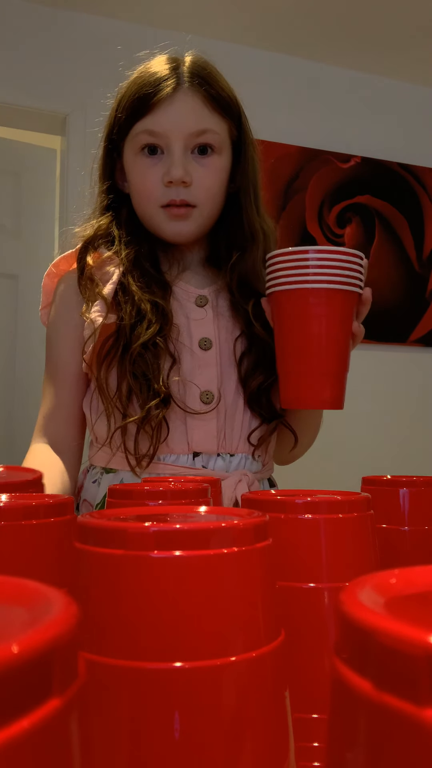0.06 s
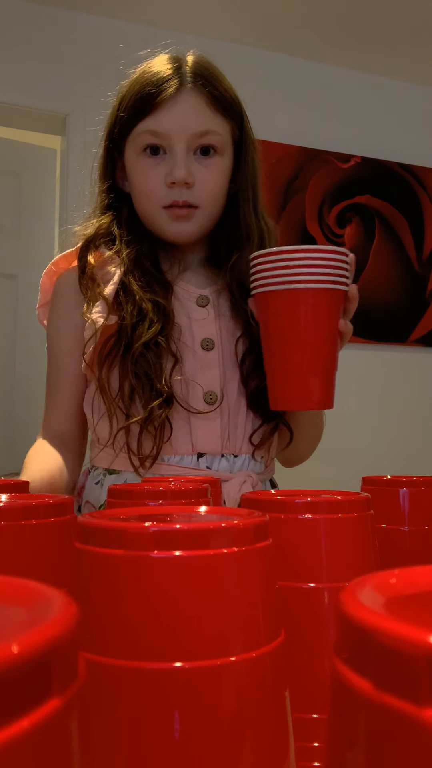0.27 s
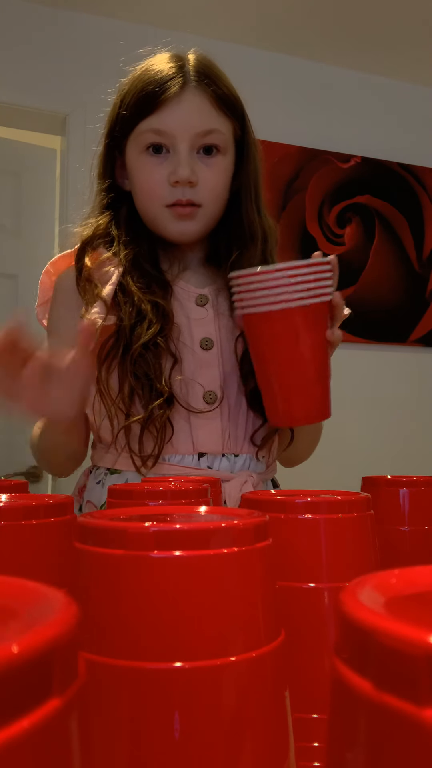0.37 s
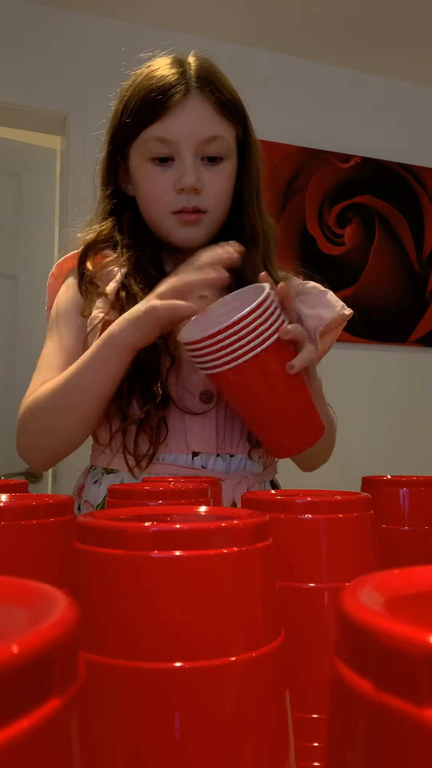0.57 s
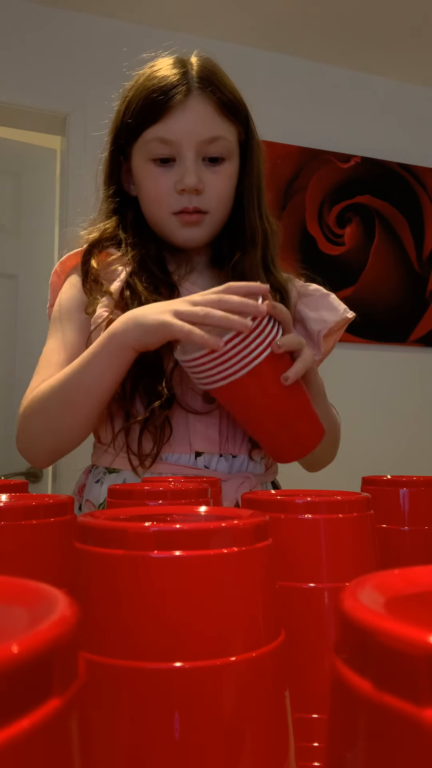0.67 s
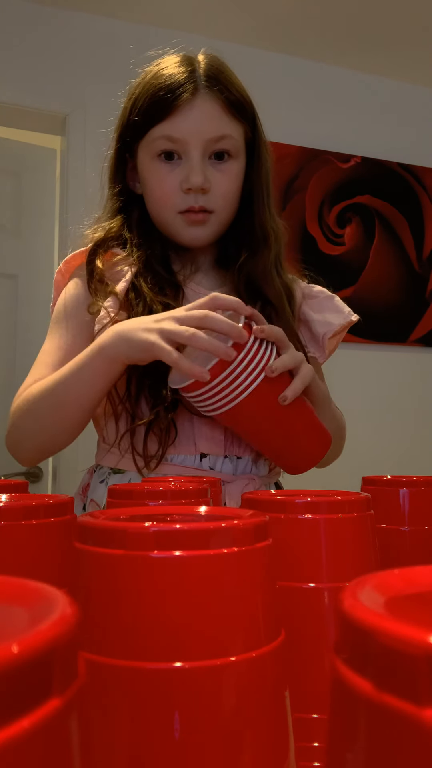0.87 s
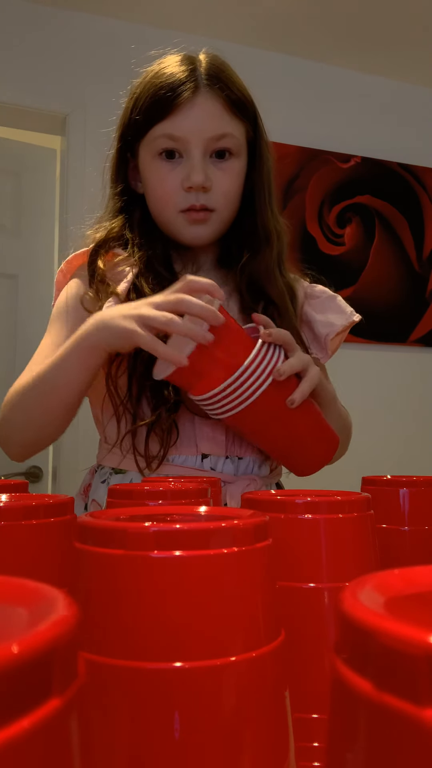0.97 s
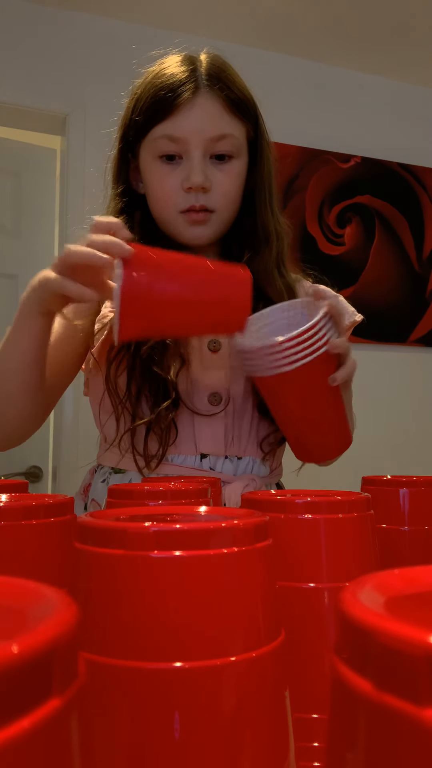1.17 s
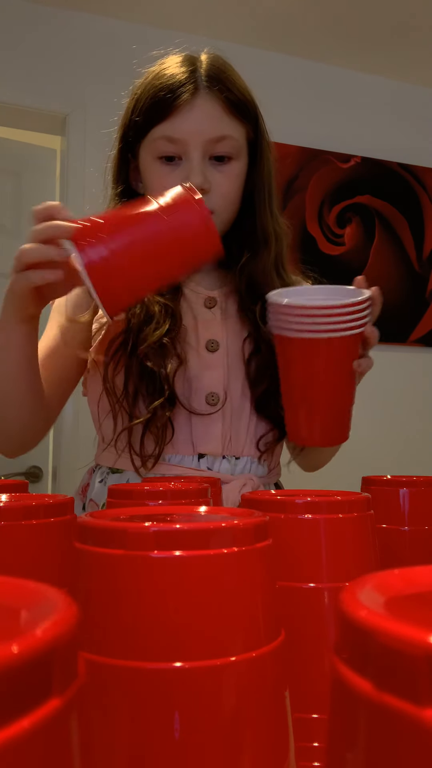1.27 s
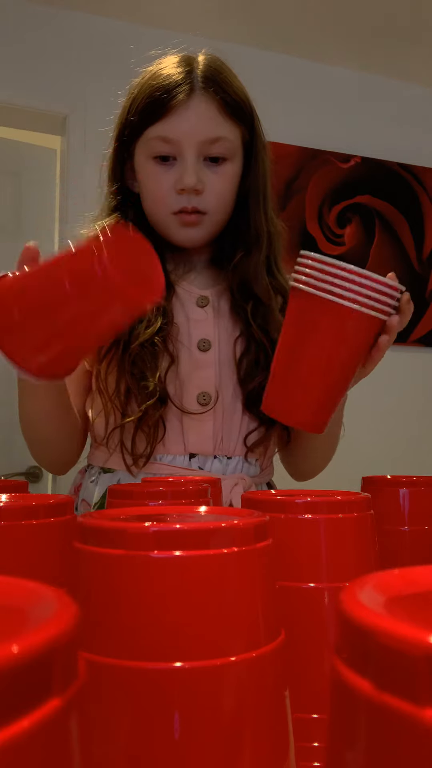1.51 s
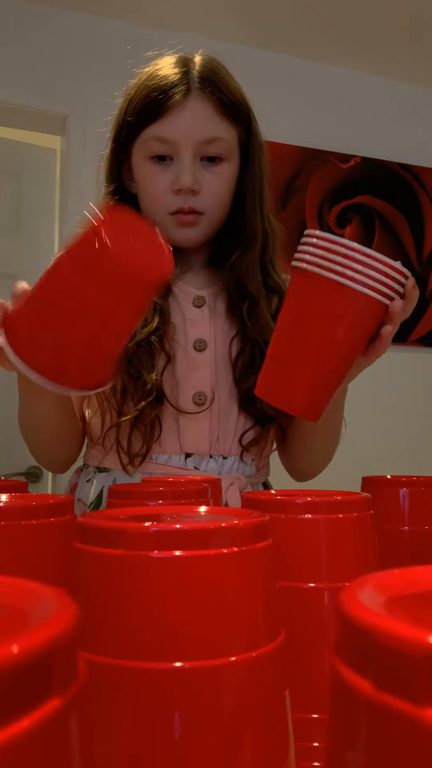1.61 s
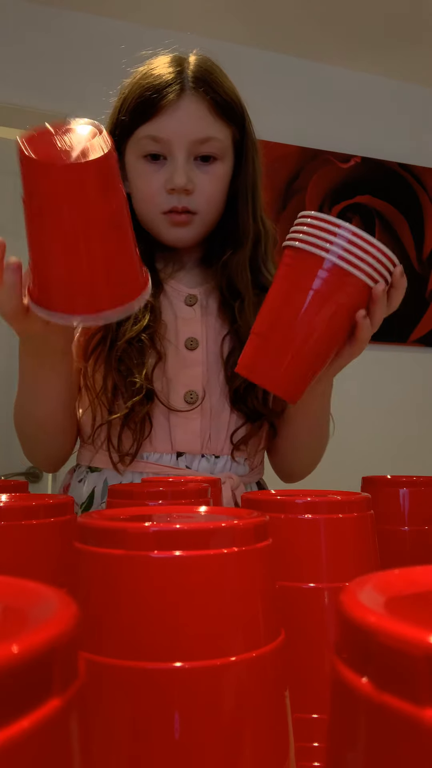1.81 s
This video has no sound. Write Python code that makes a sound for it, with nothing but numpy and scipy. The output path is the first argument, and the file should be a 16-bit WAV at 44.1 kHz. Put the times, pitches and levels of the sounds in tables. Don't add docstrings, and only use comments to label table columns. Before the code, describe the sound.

Plastic cup scrapes and knocks down hard on a table, then nested cups click and rub apart

```python
import sys
import numpy as np
from scipy import signal
from scipy.fft import rfft, irfft, next_fast_len
from scipy.io import wavfile
from scipy.ndimage import map_coordinates

SR = 44100
rng = np.random.default_rng(int(sys.argv[2]) if len(sys.argv) > 2 else 0)


def materialize(psi):
    bounded = np.clip(np.atleast_2d(psi).T, -1, 1)
    quanta = np.round(bounded * 32767).astype(np.int16)
    wavfile.write(sys.argv[1], SR, quanta)


def how_loud(loudness_db):
    steps = np.asarray(loudness_db, float) / 20
    return 10 ** steps


N = 81585
FADE_DB = 296


def unit(x):
    return x / np.sqrt(np.mean(x ** 2) + 1e-20)


def along(points, hz):
    f, v = np.transpose(points)
    return np.interp(np.log(hz + 1), np.log(f + 1), v)


def level(rows):
    s, db = np.transpose(rows)
    return how_loud(np.interp(np.arange(N) / SR, s, db, left=-120))


def filtered(x, response):
    m = next_fast_len(len(x) + 8192)
    return irfft(rfft(x, m) * response(np.fft.rfftfreq(m, 1 / SR)), m)[:len(x)]


def coloured(x, spectrum):
    return filtered(x, lambda f: how_loud(along(spectrum, f)))


def body(peaks):
    def response(f):
        total = 0
        for k, (hz, width, db) in enumerate(peaks):
            damping = 1j * f * width
            total = total + (-1) ** k * how_loud(db) * damping / (hz * hz - f * f + damping)
        return total
    return response


def hiss(spectrum, size):
    return unit(coloured(rng.standard_normal(size), spectrum))


def wobble(rate, size):
    knots = rng.standard_normal(int(size * rate / SR) + 4)
    return map_coordinates(knots, [np.arange(size) * rate / SR])


def grit(rate, depth_db):
    return how_loud(depth_db * wobble(rate, N)) * rng.standard_normal(N)


def ring(modes, t, rise):
    tones = sum(how_loud(db - 60 * t / t60) * np.sin(2 * np.pi * hz * t) for hz, db, t60 in modes)
    return tones * (1 - np.exp(-t / rise))


def add(track, s, sound):
    part = track[round(s * SR):][:len(sound)]
    part += sound[:len(part)]


def scrape(peaks, spectrum, tuned_db, wide_db):
    tuned = unit(filtered(grit(95, 4.6), body(peaks)))
    rasp = unit(coloured(grit(250, 1.6), spectrum))
    return how_loud(tuned_db) * tuned + how_loud(wide_db) * rasp


# (frequency [Hz], width [Hz], level [dB])
WALL_BANDS = [(2044, 91, -15), (2417, 18.6, -7), (2690, 20, -7), (2895, 102, -4.5), (3290, 33, 0.5),
              (3624, 54, -5), (3750, 26, -13), (4006, 65, -9), (5150, 57, -13.5), (5690, 63, -20)]


def banded(x):
    bands = body([(hz, width, db / 3) for hz, width, db in WALL_BANDS])
    return filtered(x, lambda f: 1 + how_loud(5.5) * np.abs(bands(f)))


# (time [s], level [dB])
DRAG_LEVEL = [
    (0, -38.5),
    (.04, -48.5),
    (.1, -47),
    (.15, -52.5),
    (.18, -49),
    (.215, -45.5),
    (.23, -40),
    (.3, -91),
]
# (frequency [Hz], width [Hz], level [dB])
DRAG_OPEN = [(320, 26, 5.5), (650, 140, 7.5), (860, 18, -30), (2010, 240, -11)]
DRAG_CLOSED = [(350, 70, 3), (542, 90, 1), (920, 68, -2.5), (2100, 100, -13)]
# (frequency [Hz], density [dB per Hz])
DRAG_RASP = [(880, -50), (1500, -22), (2090, -34), (2440, -12.5), (3710, -13), (7570, -17), (12000, -34),
             (15600, -91), (22000, -120)]


def dragging():
    close_s, rasp_db = 0.15, -14.5
    shut = np.clip(np.arange(N) / SR / close_s, 0, 1) * np.pi / 2
    lifted = np.cos(shut) * scrape(DRAG_OPEN, DRAG_RASP, 0, rasp_db)
    closed = np.sin(shut) * scrape(DRAG_CLOSED, DRAG_RASP, 0, rasp_db)
    return banded(level(DRAG_LEVEL) * (lifted + closed))


# (time [s], low note [Hz], level [dB], upper note [Hz], level [dB])
MOUTH_NOTES = [(0, 332.6, -42.5, 669.7, -43.5), (.04, 340.2, -47.5, 625, -52),
               (0.111, 341.3, -54.5, 599, -53), (0.141, 343, -47, 561, -61), (.175, 333, -48, 546, -53),
               (.19, 329, -44, 561, -45.5), (.222, 350, -43, 568, -50), (.235, 340, -89, 540, -88)]


def air_note(hz, db):
    waver_hz, waver_db = 45, 3.5
    swell = how_loud(db + waver_db * wobble(waver_hz, N))
    pitch = hz * (1 + .012 * wobble(waver_hz, N))
    return swell * np.sin(2 * np.pi * np.cumsum(pitch) / SR)


def mouth():
    s, *columns = np.transpose(MOUTH_NOTES)
    low_hz, low_db, up_hz, up_db = (np.interp(np.arange(N) / SR, s, c) for c in columns)
    return np.sqrt(2) * (air_note(low_hz, low_db) + air_note(up_hz, up_db))


# (time [s], peak [dB], rim brightness [dB])
KNOCKS = [
    (0.0005, -43, 0),
    (0.0874, -45, -2),
    (0.2238, -7, 0),
    (0.3288, -22.5, -5),
]
# (frequency [Hz], level [dB], t60 [s])
CUP_MODES = [(346.7, 7, 0.027), (670, -7.5, 0.023), (926, -6.5, 0.046), (1240, -22, 0.15),
             (1980, -16.5, 0.033), (2870, -23.5, 0.036), (4076, -27.5, 0.063), (3293, -35.5, 0.17),
             (2128, -28, .08), (7560, -16.5, 0.011), (8250, -30, 0.049)]
# (frequency [Hz], level [dB], t60 [s])
HUM_MODES = [(154.7, -29.5, 0.98), (208.2, -33, 0.86), (274.5, -19.5, 0.97), (313, -10.5, 0.53),
             (333, -15, 0.6), (367, -15, 0.68), (487.6, -23.5, 0.79), (563, -35.5, 0.96),
             (919.4, -16, 0.31)]
# (frequency [Hz], level [dB])
RIM_HISS = [(600, -7.5), (1500, -10), (2500, -2), (8000, -7.5), (12000, -3.5), (16000, -11)]


def knocks():
    crack_db, crack_t60 = -28.5, 0.041
    near, blows, t = np.zeros(N), np.zeros(N), np.arange(SR) / SR
    for s, db, bright_db in KNOCKS:
        for hz, mode_db, t60 in CUP_MODES:
            start = s + .0006 + 0.51 / hz
            mode = (hz, db + mode_db + bright_db * (hz > 1500), t60)
            add(near, start, ring([mode], t, 1.09 / hz))
        crack = how_loud(db + crack_db - 60 * t / crack_t60) * hiss(RIM_HISS, len(t))
        hum = sum(ring([mode], t, 0.054) * how_loud(3 * wobble(30, len(t))) for mode in HUM_MODES)
        add(near, s, crack + how_loud(db - FADE_DB * t ** 2) * hum)
        blows[round(s * SR)] = how_loud(db + 26.5 + bright_db / 4)
    return near, blows


def strikes(events, burst_noise):
    near, far, t = np.zeros(N), np.zeros(N), np.arange(SR // 8) / SR
    for s, db, hz, hiss_db, t60 in events:
        fuzz = unit(filtered(rng.standard_normal(len(t)), body([(hz, 0.1 * hz, 0)])))
        tone = 0.87 * np.sin(2 * np.pi * hz * t) + 0.49 * fuzz
        burst = how_loud(hiss_db) * burst_noise(len(t))
        shape = how_loud(db - 6.5 - 60 * t / t60) * (1 - np.exp(-t / 0.00021))
        add(near, s, shape * (tone + burst))
        add(far, s, shape * (.35 * tone + burst))
    return near, far


# (time [s], peak [dB], ring [Hz], hiss over the ring [dB], t60 [s])
TAPS = [(.010, -45, 2100, -2, .03), (.0887, -41, 2130, -0.5, 0.035), (.111, -45.5, 2250, 1, .03),
        (0.158, -55.5, 2730, 6, .03), (0.1945, -53, 2050, -2, .04), (0.329, -34.5, 3000, 3.5, 0.034),
        (.626, -53.5, 7800, 7.5, 0.036), (0.79, -52, 3000, 2, 0.033), (1.051, -43, 4500, 3.5, 0.032),
        (1.1173, -29.5, 3026, -11.5, 0.03), (1.121, -45, 3440, -6, 0.18), (1.293, -54, 4950, 2, .04),
        (1.357, -46, 3450, 0.5, 0.033), (1.566, -47.5, 4500, 4, 0.046), (1.601, -46, 2780, 6, 0.051),
        (1.615, -41.5, 2346, -4.5, .09), (1.764, -49.5, 2800, -2, .04)]
# (frequency [Hz], level [dB])
TAP_HISS = [(600, -11), (1500, -7), (2500, 2.5), (4500, -0.5), (8000, -6), (10000, -34), (16000, -40)]


def taps():
    return strikes(TAPS, lambda size: unit(banded(hiss(TAP_HISS, size))))


# (time [s], level
# [dB], frequency [Hz], t60 [s])
BONKS = [(.662, -50, 645, 0.089), (0.091, -58, 1240, 0.24), (.1, -60, 920, .3), (0.344, -47, 1273, 0.077),
         (.402, -51.5, 1250, 0.17), (0.556, -50, 257, 0.078), (.66, -48.5, 268, 0.059),
         (.877, -42, 772, 0.074), (.9, -50, 770, 0.052), (.922, -35.5, 739, 0.069),
         (.945, -40.5, 715, 0.051), (.977, -40, 480, 0.072), (1.118, -49, 710, 0.047),
         (0.879, -46, 264, 0.039), (0.929, -38, 352, 0.028), (.978, -43, 274, 0.044),
         (.979, -40, 645, 0.026), (1.014, -44, 755, 0.03), (1.043, -46, 730, 0.043),
         (1.456, -44, 331, 0.048), (1.459, -66, 202, 0.061), (1.456, -35, 545, 0.019),
         (1.526, -34.5, 709.5, 0.07), (1.544, -45, 327.5, 0.26), (1.585, -42, 690, 0.065),
         (1.591, -57.5, 332, 0.055), (1.613, -50, 709, .06), (1.632, -49, 706, 0.057),
         (1.695, -44, 713, 0.043), (1.712, -45, 711, 0.054), (1.791, -44.5, 726, 0.026),
         (1.792, -46.5, 313, 0.097)]


def bonks():
    out, t = np.zeros(N), np.arange(SR // 3) / SR
    for s, db, hz, t60 in BONKS:
        modes = [(hz, db + 5.5, t60), (2.1 * hz, db - 23, t60 / 2)]
        add(out, s, ring(modes, t, 0.092 * t60))
    return out


# (frequency [Hz], width [Hz], level [dB])
STACK_BODY = [(290, 110, -1.5), (715, 105, -0.5), (1470, 120, -14), (2870, 220, -7.5), (3960, 510, -16.5)]
STACK_RING_DB = -6
# (time [s], level [dB])
GRIP_LEVEL = [
    (.54, -64),
    (.55, -61.5),
    (.62, -69.5),
    (.67, -66.5),
    (.75, -72.5),
    (.85, -79),
    (.88, -64),
]
LOOSEN_LEVEL = [
    (.74, -79),
    (.79, -68),
    (.87, -60.5),
    (.88, -106),
]


def gripping():
    return (level(GRIP_LEVEL) + level(LOOSEN_LEVEL)) * scrape(STACK_BODY[3:], RIM_HISS, STACK_RING_DB, 0)


# (time [s], peak [dB], ring [Hz], hiss over the ring [dB], t60 [s])
RIM_CLICKS = [(0.545, -47.5, 3170, 9, 0.024), (0.6583, -54.5, 3040, 7, 0.075), (.8758, -37, 5540, 4, 0.011),
              (0.924, -31.5, 5440, 2, 0.017), (0.976, -45.5, 3070, 8, 0.026),
              (1.016, -31.5, 2910, -4.5, 0.04), (1.031, -44, 2800, 6.5, 0.042),
              (1.3525, -30.5, 2970, -9, 0.02), (1.398, -48, 3960, 8, 0.015),
              (1.4076, -46.5, 4000, 9.5, 0.038), (1.4534, -35.5, 3110, 11, 0.023),
              (1.514, -33, 3600, -9, 0.044), (1.5145, -39, 5100, -13, 0.023),
              (1.524, -40.5, 7420, 6, 0.035), (1.5811, -29, 7820, -9, 0.032),
              (1.574, -37.5, 6470, 0, 0.063), (1.586, -37, 2235, -9, 0.12), (1.593, -32, 5080, -6, 0.043),
              (1.612, -32.5, 3430, -10, 0.035), (1.685, -47, 2790, -24, 0.033),
              (1.698, -46.5, 4100, 4, 0.021)]


def rim_clicks():
    return strikes(RIM_CLICKS, lambda size: hiss(RIM_HISS, size))


# (time [s], level [dB])
PULL_LEVEL = [
    (.872, -67),
    (.879, -51),
    (.93, -46),
    (.97, -46),
    (1.02, -46),
    (1.07, -52.5),
    (1.125, -59),
    (1.145, -64),
    (1.19, -95),
]
# (frequency [Hz], density [dB per Hz])
PULL_RASP = [(88, -58), (150, -30), (275, -2), (534, -9), (730, -3.5), (1290, -28), (2920, -15.5),
             (11500, -20), (16000, -19)]


def pulling():
    return level(PULL_LEVEL) * scrape(STACK_BODY, PULL_RASP, STACK_RING_DB, 0)


# (time [s], level [dB])
SETTLE_LEVEL = [
    (1.34, -93),
    (1.36, -57.5),
    (1.45, -61),
    (1.47, -52),
    (1.56, -61.5),
    (1.585, -47.5),
    (1.63, -56.5),
    (1.76, -61),
    (1.82, -87),
]
# (frequency [Hz], density [dB per Hz])
SETTLE_RASP = [(88, -55), (150, -41), (315, -4), (601, -23), (716, -1.5), (1190, -15.5), (2310, -18.5),
               (5050, -13), (16000, -23.5)]


def settling():
    return banded(level(SETTLE_LEVEL) * scrape(STACK_BODY, SETTLE_RASP, STACK_RING_DB - 0.5, -0.91))


# (frequency [Hz], t60 [s])
ROOM_DECAY = [(150, 1), (1000, 0.92), (4000, 0.78), (8000, 0.51), (14000, 0.23)]


def room(x):
    gap_s = .006
    hz, t, z = signal.stft(rng.standard_normal(SR * 3 // 4), SR, nperseg=256)
    decay_db = -60 * t / along(ROOM_DECAY, hz)[:, None] - FADE_DB * t ** 2
    tail = signal.istft(z * how_loud(decay_db), SR, nperseg=256)[1]
    delayed = np.pad(x, (round(gap_s * SR), 0))
    return signal.fftconvolve(delayed, tail / np.linalg.norm(tail))[:N]


# (frequency [Hz], density [dB per Hz])
CLATTER = [(110, -51), (250, 2.5), (420, 1.5), (850, -15.5), (1500, -23.5), (2050, -18.5), (4700, -30),
           (8000, -25.5), (16000, -38)]
# (frequency [Hz], density [dB per Hz])
ROOM_AIR = [(40, 0.5), (70, 4.5), (130, 1), (280, -1), (800, -9.5), (1400, -22.5), (3000, -27), (8000, -39),
            (14000, -50)]


def scene():
    drag, air_notes = dragging(), mouth()
    near, blows = knocks()
    tap_near, tap_far = taps()
    bodies = bonks()
    click_near, click_far = rim_clicks()
    close = near + tap_near + click_near + bodies + air_notes
    rubs = drag + gripping() + pulling() + settling()
    clatter = coloured(banded(room(blows)), CLATTER)
    stack_wet = room(how_loud(-7) * (tap_far + click_far) + how_loud(-12) * bodies)
    wet = clatter + how_loud(-20) * room(near) + stack_wet
    return (close + rubs + wet + how_loud(-58.5) * hiss(ROOM_AIR, N))[None]


def band_limit(x):
    return signal.sosfilt(signal.butter(12, 16650, fs=SR, output="sos"), x)


# (frequency [Hz], gain [dB])
MIC = [(30, -21), (60, -11), (120, 1.5), (8200, 0.5), (8600, -6), (16000, -12)]


def record(dry):
    ceiling, top_hz = .44, 15950
    dry = dry / (1 + np.abs(dry / ceiling) ** 3) ** (1 / 3)
    mix = filtered(dry[0], lambda f: how_loud(along(MIC, f)) * (f < top_hz))[None]
    return band_limit(mix)


dry = scene()
out = record(dry)
materialize(out)
```